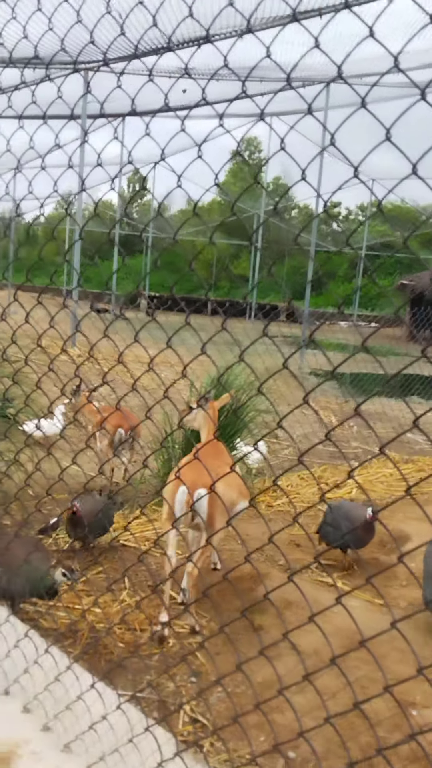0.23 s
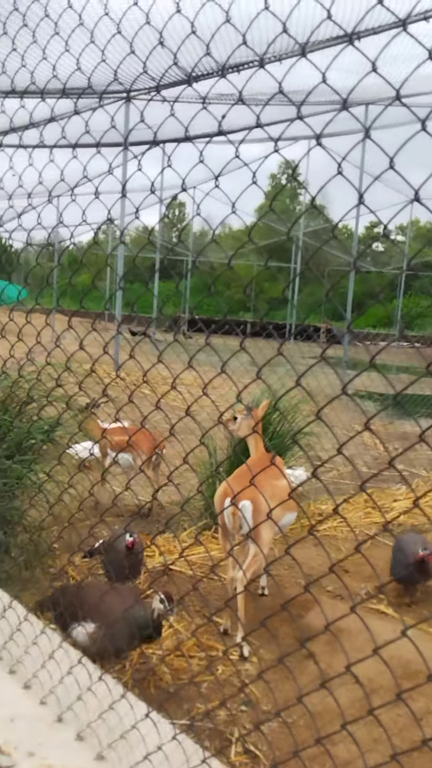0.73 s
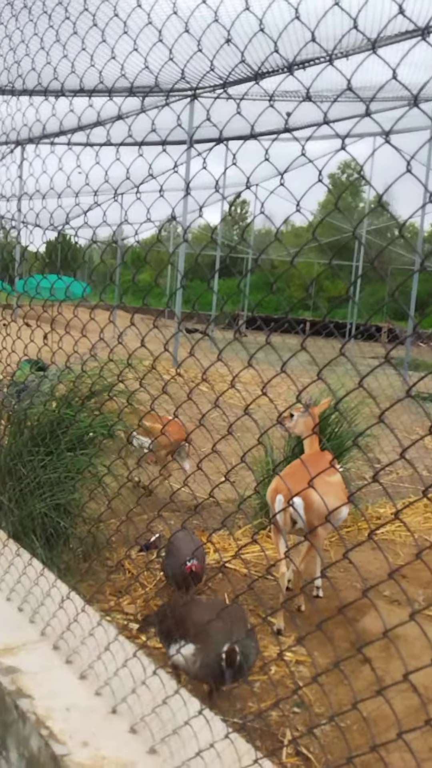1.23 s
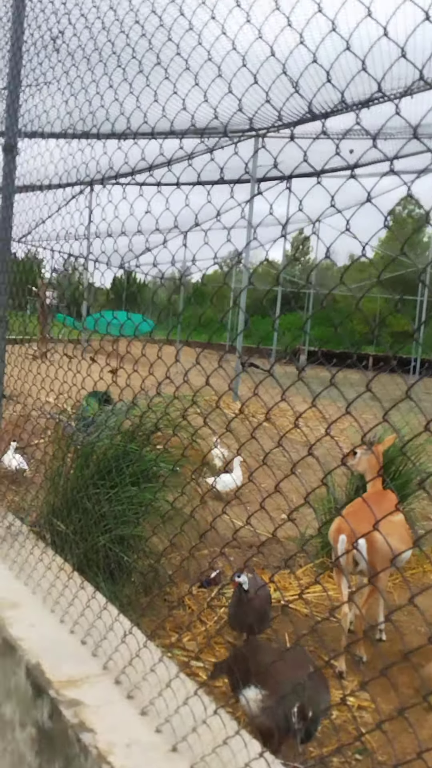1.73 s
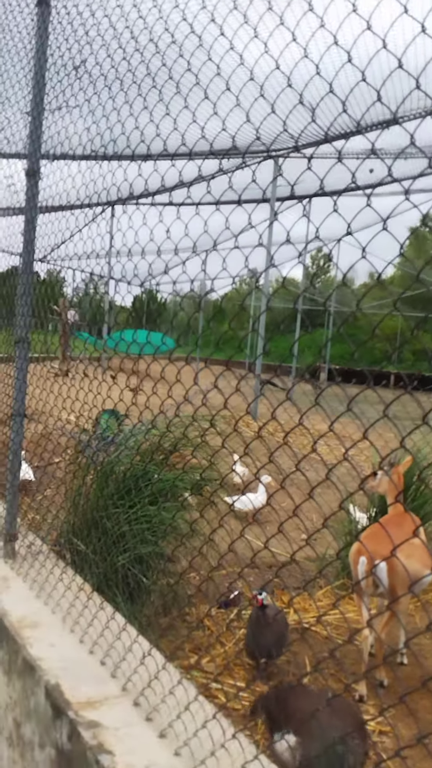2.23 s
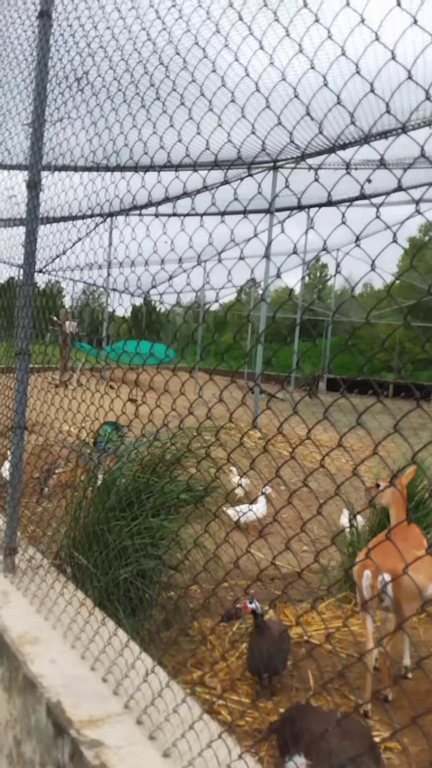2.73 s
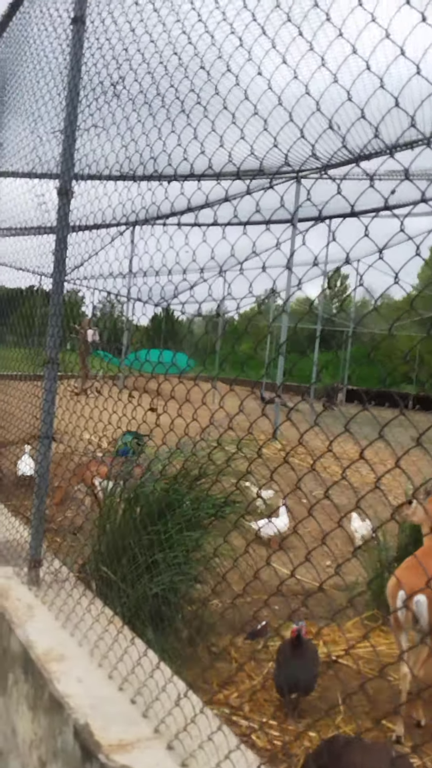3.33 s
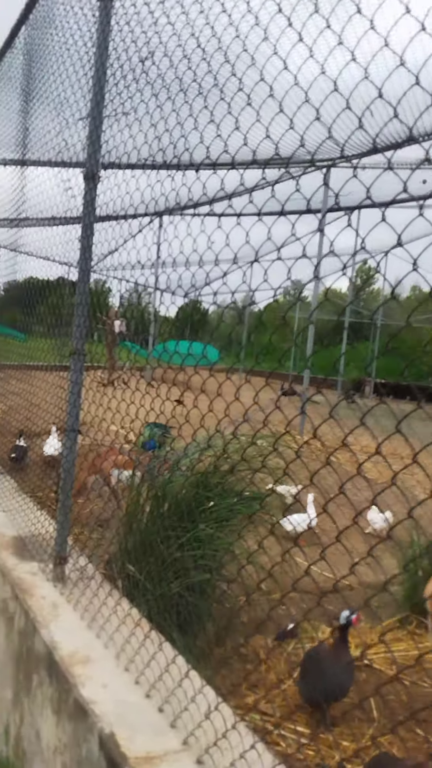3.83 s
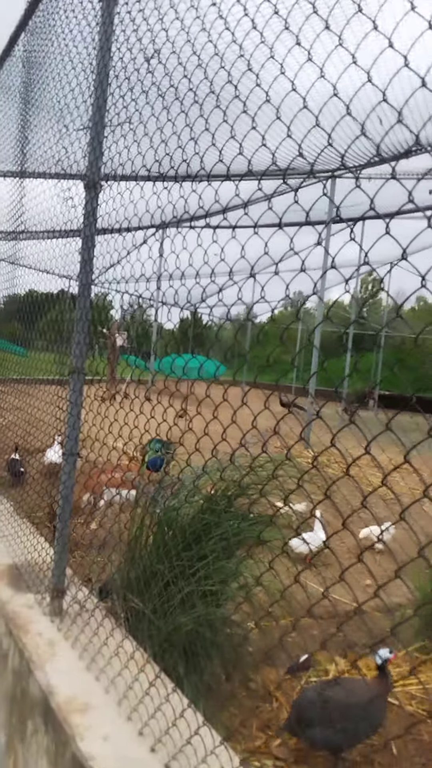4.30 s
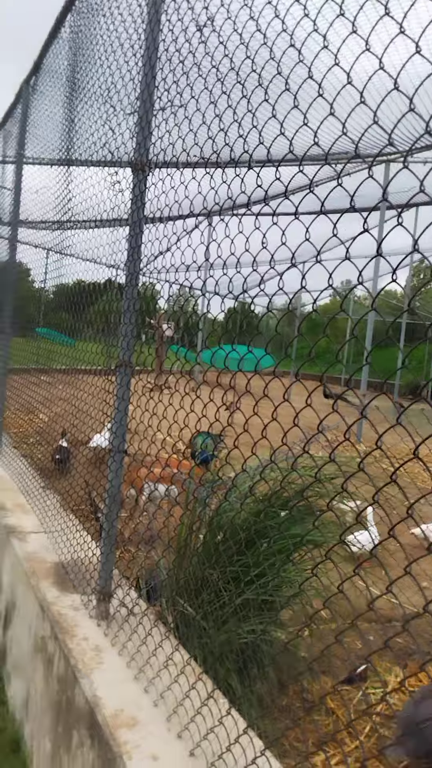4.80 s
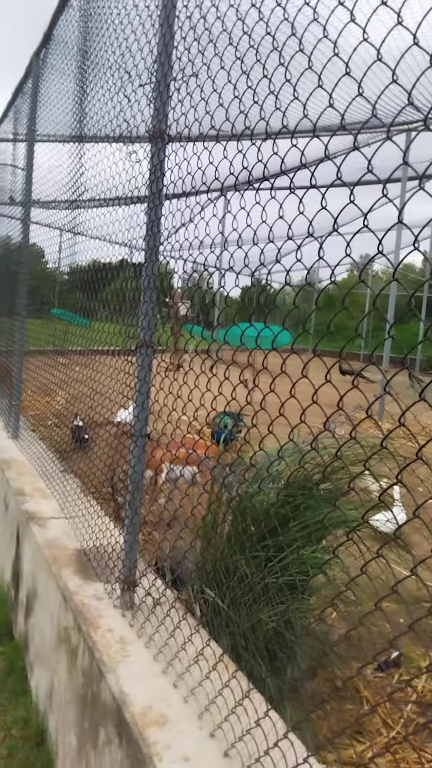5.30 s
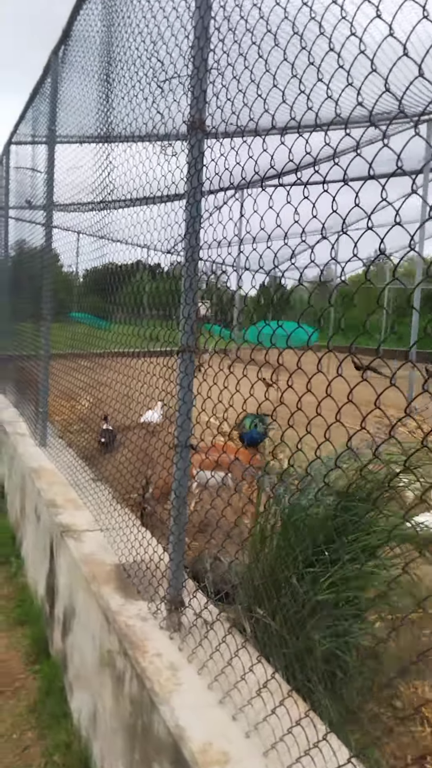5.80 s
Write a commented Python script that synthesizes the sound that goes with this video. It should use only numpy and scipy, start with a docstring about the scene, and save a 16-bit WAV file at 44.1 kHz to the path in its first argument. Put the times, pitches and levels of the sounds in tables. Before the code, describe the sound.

Guineafowl give sharp, squeaky chirps in a gusty outdoor pen, then break into a fast, harsh rattling run while wind buffets the microphone.

```python
"""Guineafowl in a gusty open enclosure

Close guineafowl chirp, then break into a harsh rattling run: falling harmonic tones, roughened by a second
membrane, are filtered by a throat and reflected by the yard. Gusts buffet two microphone ports in turn with
shaped noise and sharp pressure dips. After a faint rasp, a far crow caws and another bird honks, as pulse trains
through a resonance; a small bird twitters in gliding sines. Straw rustles and open air hisses, as coloured noise."""
import sys
import numpy as np
from scipy import signal
from scipy.fft import rfft, irfft, next_fast_len
from scipy.io import wavfile
from scipy.ndimage import uniform_filter1d

SR = 44100
rng = np.random.default_rng(int(sys.argv[2]) if len(sys.argv) > 2 else 0)


def master_out(mix):
    """Clip the mix to full scale and print it as 16-bit PCM to the path in sys.argv[1]."""
    frames = np.transpose(np.atleast_2d(mix))
    ceiling = np.clip(frames, -1, 1)
    pcm = np.round(ceiling * 32767).astype(np.int16)
    wavfile.write(sys.argv[1], SR, pcm)


N = 266937
TIME = np.arange(N) / SR
# a call swells by twice SWELL_DB while its pitch falls by the share FALL; a squeak leads into it
SWELL_DB, FALL, SQUEAK_DB = 3.0, 0.115, -11.5
LEAD_S = .022  # the squeak starts this long before the note


def gain_of(db):
    """Logarithmic level: converts decibels to an amplitude ratio."""
    return 10 ** (np.asarray(db) / 20)


def evened(x):
    """Power normalisation: scales a signal to rms 1."""
    return x / np.sqrt(np.mean(x ** 2) + 1e-20)


def read(points, hz):
    """Logarithmic frequency scale: interpolates a spectrum along log frequency."""
    f, value = np.transpose(points)
    return np.interp(np.log(hz + 1), np.log(f), value)


def colour(x, points):
    """Linear filtering: multiplies the transform by a spectrum given in dB."""
    size = next_fast_len(x.shape[-1] + 512)
    gain = gain_of(read(points, np.fft.rfftfreq(size, 1 / SR)))
    return irfft(rfft(x, size) * gain, size)[..., :x.shape[-1]]


def wander(size, hz):
    """Low-passed noise: a smooth random course of rms about 1, with its corner at the given rate."""
    full = next_fast_len(size)
    lowpass = 1 / np.sqrt(1 + (np.fft.rfftfreq(full, 1 / SR) / hz) ** 4)
    return evened(irfft(rfft(rng.standard_normal(full)) * lowpass, full)[:size])


def ports(db):
    """Level difference between channels: left and right gains of mean power 1."""
    return evened(gain_of([[db / 2], [-db / 2]]))


def add(mix, s, sound):
    """Superposition: adds a sound into the mix at a time in seconds."""
    part = mix[:, max(round(s * SR), 0):][:, :sound.shape[-1]]
    part += sound[..., :part.shape[-1]]


def yard(x, db, t60):
    """Diffuse reverberation: ground, wall and fence scatter decaying reflections, different at each port."""
    t = TIME[:int(abs(t60) * SR) + 100]
    taps = rng.standard_normal((2, len(t))) * gain_of(-60 * t / t60)
    taps[:, :10] = 0
    reflections = signal.fftconvolve(x, taps / np.linalg.norm(taps[0]), axes=1)
    return x + gain_of(db) * reflections[:, :x.shape[1]]


def still_air(level_db=-57):
    """Broadband ambient noise: coloured hiss at both ports, swaying slowly in level."""
    # spectrum of the still air: (frequency [Hz], relative density [dB])
    air_colour = [(100, -24), (500, -33), (1000, -2), (2000, 1), (3000, -4), (4500, -2.5), (6500, 0.5),
                  (8000, 3), (10000, 0), (11800, -11.5), (15000, -23)]
    sway_db = .7 * wander(N, 4)
    return gain_of(level_db + sway_db) * evened(colour(rng.standard_normal((2, N)), air_colour))


def wind_force():
    """Unsteady flow: amplitudes at each port of the steady flow and of puffs that rise, hold and fall."""
    # force of the steady flow on each port: (time [s], force [dB])
    left_curve = [(0.0, -52), (0.36, -53), (0.5, -81), (0.93, -66), (1.02, -51), (1.19, -40), (1.31, -24.5),
                  (1.49, -57.5), (3.07, -55.5), (3.2, -38), (3.38, -52), (3.64, -55.5), (3.74, -29),
                  (4.0, -16.5), (4.36, -20), (4.47, -45), (4.85, -41.5), (4.98, -63.5), (6.05, -69.5)]
    right_curve = [(0.0, -56), (0.45, -53), (0.75, -65), (1.0, -42), (1.22, -67), (1.43, -31), (1.7, -20),
                   (1.85, -25), (2.48, -23), (2.8, -34.5), (3.12, -21), (3.45, -33.5), (3.8, -30),
                   (4.08, -50), (4.85, -50), (4.96, -72), (5.32, -48.5), (5.93, -54.5), (6.05, -70)]
    # puffs striking mainly one port: (start [s], hold length [s], force [dB], left-right difference [dB])
    puff_table = [(0.0, 0.13, -46.5, 23), (0.18, 0.086, -50, -17), (0.27, 0.069, -47, 19),
                  (0.555, 0.089, -35, -49), (0.678, 0.11, -49.5, 16), (0.837, 0.097, -39, -27),
                  (1.005, 0.065, -40.5, 28), (1.254, 0.16, -35, 28), (1.42, 0.087, -31.5, -27),
                  (1.563, 0.058, -43, 15), (2.128, 0.12, -53.5, 18), (2.688, 0.075, -48.5, 15),
                  (2.983, 0.077, -28, -41), (4.431, 0.095, -35.5, -28), (4.721, 0.051, -38, -33),
                  (5.074, 0.096, -48.5, -0.5), (5.295, 0.032, -56, 14), (5.542, 0.097, -47.5, -26),
                  (5.748, 0.044, -46.5, 40), (5.896, 0.033, -55, -16)]
    attack_s, release_s = 0.022, 0.032
    flow = gain_of([np.interp(TIME, *np.transpose(curve)) for curve in (left_curve, right_curve)])
    puffs = np.zeros((2, N))
    for s, length, db, side_db in puff_table:
        before = np.maximum(s - TIME, 0) / attack_s
        after = np.maximum(TIME - s - length, 0) / release_s
        envelope = np.exp(-np.minimum(before + after, 10) ** 2)
        puffs += gain_of(db) * ports(side_db) * envelope
    return flow, puffs


def wind(force, puffs, rumble_db=-19.0, rumble_growth=0.11, buffet_db=1.5, lump_db=4.0, burst_db=6.5,
         burst_hz=55):
    """Turbulent pressure noise: each port's own eddies give a lumpy rumble and a sputtering buffet."""
    # spectra of the rumble and the buffet: (frequency [Hz], relative density [dB])
    rumble_colour = [(15, -21), (35, -19), (60, -6), (100, 1.5), (170, -4.5), (260, -11), (400, -24),
                     (700, -56.5), (1500, -115)]
    buffet_colour = [(80, -44), (200, 1), (320, 0.5), (500, -5), (800, -17), (1200, -30), (2000, -37.5),
                     (4000, -51), (12000, -77)]
    knee_db = -42.5  # above this force the rumble hardly grows, while the buffet grows on
    puff_rumble_db = 2.5  # a puff is a large slow eddy: it rumbles more than the steady flow does
    out = np.zeros((2, N))
    for side in range(2):
        over = force[side] / gain_of(knee_db)
        slow = over / np.sqrt(1 + over ** 2) ** (1 - rumble_growth)
        slow *= gain_of(puff_rumble_db * puffs[side] / force[side])
        eddies = wander(N, burst_hz)
        lumps = gain_of(lump_db * eddies)
        bursts = gain_of(burst_db * eddies + 2 * wander(N, 400))
        rumble = colour(rng.standard_normal(N) * lumps, rumble_colour)
        buffet = colour(rng.standard_normal(N) * bursts, buffet_colour)
        for layer, gain in ((rumble, slow * gain_of(rumble_db)), (buffet, force[side] * gain_of(buffet_db))):
            # levelled over 4000 samples, so that the force sets the slow course
            out[side] += gain * layer / np.sqrt(uniform_filter1d(layer ** 2, size=4000) + 1e-12)
    return out


def slaps(force, level_db=0.0, width=.0005):
    """Vortex pressure: a small vortex crossing a port gives one sharp dip of pressure."""
    # the hardest slaps, shared between the ports by force: (time [s], relative peak [dB])
    hard_slaps = [(1.074, -20), (1.298, -12), (1.588, -15), (1.667, -6), (1.72, -4.5), (1.893, -1.5),
                  (2.015, -11), (2.097, -5.5), (2.199, -11), (2.271, -9.5), (2.288, -7), (2.453, -9),
                  (3.167, -9), (3.876, -7), (3.919, -2), (4.116, -9), (4.267, -2.5)]
    # lesser slaps come by chance at each port, sized by the force of the wind
    per_s, over_force_db, spread_db = 16, 8, 8.5
    u = (np.arange(801) - 400) / SR / width
    dip = -(1 - .4 * u ** 2) / (1 + .5 * u ** 2) ** 3 * np.exp(-(u / 5) ** 2)
    sizes = force * gain_of(over_force_db + spread_db * rng.uniform(-1.5, 1, (2, N)))
    hits = sizes * (rng.random((2, N)) < per_s / SR)
    for s, db in hard_slaps:
        add(hits, s, gain_of(db + level_db) * evened(force[:, [round(s * SR)]]))
    return signal.oaconvolve(hits, dip[None], "same")


def note(length, db, swell_db, start_hz, end_hz, rough, bright_db, lead_db, size=5120, second_hz=850, flutter=0.11,
         rasp=0.43, second_harmonic_db=6.5, release_db=-27):
    """Source-filter voice: a rising squeak leads into a loud note; a second membrane makes it a screech."""
    # response of the bird's throat and beak: (frequency [Hz], gain [dB])
    throat = [(500, -111), (1000, -9), (1250, -8), (1700, -7), (2150, -0.5), (2750, 0), (3500, 2),
              (4600, -3), (6000, -10), (8200, -12.5), (10200, -9.5), (12000, -22), (13500, -33),
              (15000, -28.5)]
    t = np.arange(size) / SR - LEAD_S
    corners = [-.022, -.011, -.003, .001, .17 * length, .55 * length, .85 * length, length + .002, length + .02]
    corner_db = [lead_db - 26, lead_db - 8, lead_db, -6.5, 0, 1, -2, -10, release_db - 14 * (1 - rough)]
    level_db = np.interp(t, corners, corner_db)
    level_db += 2 * swell_db * (np.clip(t / length, 0, 1) - .5)
    shape = gain_of(level_db) * np.clip((length + .03 - t) / .01, 0, 1)
    # degree to which the tone breaks up over the note
    force = rough * np.interp(t, [0, .006, .6 * length], [.7, .45, 1])
    glide = [.7 * start_hz, 1.06 * start_hz, start_hz, .55 * start_hz + .45 * end_hz, .97 * end_hz]
    hz = np.interp(t, [-.022, -.007, .002, .5 * length, length + .006], glide)
    turns = np.cumsum(hz * (1 + .1 * (force + .17) * wander(size, 1000))) / SR
    # the second membrane modulates phase, level and breath noise
    second = np.sin(2 * np.pi * np.cumsum(second_hz * (1 + .06 * wander(size, 400))) / SR)
    turns = turns + flutter * force * second
    # the squeak is mostly the second harmonic; the others join at full pressure
    joined = np.interp(t, [-.008, .004], [.2, 1])
    others = sum(np.cos(2 * np.pi * (k * turns + rng.random())) for k in range(3, 11))
    others += (0.78 + 0.16 * rough) * np.cos(2 * np.pi * turns)  # the fundamental grows with effort
    second_harmonic = gain_of(second_harmonic_db * (0.5 - 0.51 * force)) * np.cos(4 * np.pi * turns)
    voice = second_harmonic + joined * others
    breath = rng.standard_normal(size) * (1 + 2.56 * second) * joined
    drive = evened(voice) * (1 + 1.3 * force * second) + rasp * (force + .12) * breath
    # roughness is offset in level, apart from small uneven bursts
    drive *= np.exp(.25 * force * wander(size, 160)) / np.sqrt(1 + force ** 2)
    sound = colour(colour(drive * shape, throat), [(3500, 0.0051), (8000, bright_db)])
    return gain_of(db) * sound / np.sqrt(np.sum(sound ** 2) / (length * SR))


def chirp_notes():
    """Frequency glide: single calls swell and fall in pitch after their squeak."""
    # guineafowl calls: (start [s], nominal length [s], relative level [dB], nominal starting pitch [Hz],
    # roughness [about 0-1], brightness at 8 kHz [dB])
    chirps = [(0.221, 0.011, -47.5, 1464, 0, -22), (0.942, 0.027, -14.5, 1663, 0.25, 0.5),
              (1.16, 0.012, -19.5, 1585, 0.13, -5), (1.912, 0.018, -29.5, 1515, 0.27, 1.5),
              (2.204, 0.042, -45.5, 1610, 0.56, 2), (2.382, 0.019, -22.5, 1770, 0.21, 7),
              (2.717, 0.0058, -19, 1600, 0, 7.5), (2.892, 0.033, -31.5, 1592, 0.32, 1),
              (3.053, 0.036, -15, 1670, 0.69, 3), (3.176, 0.031, -22.5, 1590, 0.5, 0.5),
              (3.283, 0.03, -18, 1700, 0.83, -1.5), (3.307, 0.027, -13.5, 1575, 0.26, 0),
              (3.421, 0.027, -15.5, 1660, 0.87, -1.5), (3.477, 0.032, -14.5, 1654, 0.28, 0.5),
              (3.595, 0.026, -15, 1715, 1.03, -4), (3.642, 0.018, -29.5, 1570, 0.28, -5),
              (3.763, 0.034, -15.5, 1657, 0.85, -4), (4.014, 0.028, -24.5, 1650, 0.87, -1.5),
              (4.043, 0.021, -13.5, 1528, 0.08, -4), (4.198, 0.014, -32.5, 1448, 0.63, -11),
              (4.559, 0.018, -27.5, 1500, 0.5, -6), (4.592, 0.017, -18.5, 1535, 0.56, -4),
              (5.087, 0.018, -20, 1564, 0.54, -10), (5.799, 0.0075, -28, 1560, 0.37, -2),
              (5.895, 0.031, -12, 1651, 0.52, -3)]
    return [(s, note(length, db, SWELL_DB, hz, hz * (1 - FALL), rough, bright_db, SQUEAK_DB))
            for s, length, db, hz, rough, bright_db in chirps]


def rattle_notes():
    """Forced phonation: the run starts with falling calls and settles into level, abrupt screeches."""
    # notes of the harsh run: (start [s], nominal length [s], relative level [dB])
    run = [(4.37, 0.036, -13.5), (4.508, 0.033, -14), (4.622, 0.033, -14.5), (4.727, 0.037, -15.5),
           (4.824, 0.037, -13.5), (4.918, 0.034, -16.5), (5.011, 0.033, -13), (5.106, 0.032, -15.5),
           (5.191, 0.029, -13), (5.285, 0.029, -13.5), (5.374, 0.032, -16), (5.476, 0.035, -15.5),
           (5.577, 0.038, -17.5), (5.677, 0.034, -21)]
    # central roughness and brightness, each varied at random from note to note
    mid_rough, rough_scatter, mid_bright_db, bright_scatter_db = 0.91, 0.11, 1.8, 2.5
    # through the run the pitch sags and each note's weight moves to its front
    first_hz, sag_hz_per_s, swell_loss_db_per_s = 1800, 82, 5.5
    # the fall dies out and the squeak weakens over this time
    settle_s, squeak_loss_db = 0.55, 14
    notes = []
    for (s, length, db), (press, gape) in zip(run, rng.uniform(-0.83, 1, (len(run), 2))):
        elapsed = s - run[0][0]
        settled = 1 - np.exp(-(elapsed / settle_s) ** 4)
        hz = first_hz - sag_hz_per_s * elapsed
        swell_db = SWELL_DB - swell_loss_db_per_s * elapsed
        end_hz = hz * (1 - FALL * (1 - settled))
        lead_db = SQUEAK_DB - squeak_loss_db * settled
        rough = mid_rough + rough_scatter * press
        bright_db = mid_bright_db + bright_scatter_db * gape
        notes.append((s, note(length, db, swell_db, hz, end_hz, rough, bright_db, lead_db)))
    return notes


def guineafowl(level_db=-3.0):
    """Early reflections: the birds move, so each note of the flock meets its own ground reflections."""
    # where the flock stands as the microphone turns: (time [s], left-right difference [dB])
    bearing = [(1.2, -3), (1.9, 6), (4.0, 0), (6.0, 3.3)]
    out = np.zeros((2, N))
    for s, voice in chirp_notes() + rattle_notes():
        side_db = np.interp(s, *np.transpose(bearing))
        add(out, s - LEAD_S, yard(ports(side_db) * voice, -2.0, .016))
    return gain_of(level_db) * out


def spread(x):
    """Phase difference and comb filtering: ports hear a near source out of phase, each with its own comb ripple."""
    hz = np.fft.rfftfreq(N, 1 / SR)
    comb = .33 * np.exp(-2j * np.pi * hz * .00115) / (1 + (hz / 6000) ** 2)  # 1.15 ms late
    lag = np.exp(-1.7j * np.clip(hz / 1000, 0, 1))
    pair = np.array([1 + comb, (1 + .6j * comb) * lag])
    return irfft(rfft(x) * pair, N)


def wash(x, db=-20.5, t60=0.82):
    """Exponential energy decay: a diffuse hiss swells with each note and dies away slowly."""
    # spectrum of the lingering hiss: (frequency [Hz], relative density [dB])
    hiss_colour = [(400, -15), (1200, 1.5), (2500, 3), (4300, 2.5), (7000, -1.5), (9800, 0), (12000, -15.5),
                   (15000, -21)]
    r = gain_of(-120 / (t60 * SR))  # decay of power per sample
    power = signal.lfilter([1 - r], [1, -r], (x ** 2).mean(0))
    return gain_of(db) * np.sqrt(power) * evened(colour(rng.standard_normal((2, N)), hiss_colour))


def far_call(length, db, hz, rasp, throat_hz, width_hz, size=32768):
    """Subharmonic pulse train: alternately strong and weak pulses on an arching pitch excite one resonance."""
    arch = abs(np.sin(np.pi * np.clip(np.arange(size) / SR / length, 0, 1)))
    turns = np.cumsum(hz * (.91 + .09 * arch) * (1 + .03 * rasp * wander(size, 150))) / SR
    pulses = sum(np.cos(2 * np.pi * k * turns) for k in range(1, 20))
    pulses = pulses * (1 + rasp * np.cos(np.pi * turns))
    resonance = 1 / (1 + abs((np.fft.rfftfreq(size, 1 / SR) - throat_hz) / width_hz) ** 3)
    sound = irfft(rfft(evened(pulses) + .5 * rasp * rng.standard_normal(size)) * resonance)
    return gain_of(db) * evened(sound) * arch ** .8


def far_birds(chirp_db=-57):
    """Distant sources: reverberant rasp, caws and honks, and a small bird see-sawing between falling chirps."""
    # a faint rasp at .62 s, then calls of the crow, then of the honking bird: (start [s], length [s],
    # relative level [dB], pitch at the top of the arch [Hz], rasp [0-1], resonance centre [Hz])
    rasp_and_caws = [(.62, .15, -66, 150, .8, 2450), (1.52, .38, -52, 145, .55, 1760),
                     (2.15, .47, -52, 150, .55, 1780)]
    honks = [(3.1, .25, -40, 221, .04, 860), (3.72, .32, -54, 238, .25, 1400)]
    out = np.zeros((2, N))
    for s, *call in rasp_and_caws:
        add(out, s, far_call(*call, width_hz=450))
    for s, *call in honks:
        add(out, s, far_call(*call, width_hz=.27 * call[-1]))
    out = yard(out, 3, .16)
    t = np.arange(1700) / SR
    for k in range(17):  # pairs, each a little softer
        for s, hz, db in [(.07, 6400, chirp_db), (.162, 6150, chirp_db - 2)]:
            chirp = np.sin(2 * np.pi * np.cumsum(hz * (1 - 3.2 * t)) / SR) * np.hanning(len(t))
            add(out, s + k * .1745, gain_of(db - .4 * k) * chirp)
    return out


def rustle(s=.62, length=0.27, db=-50):
    """Friction noise: something brushes through dry straw, fine crackles under a soft swell."""
    size = 13000
    swell = np.sin(np.pi * np.clip(np.arange(size) / SR / length, 0, 1)) ** 2
    crackles = rng.standard_normal((2, size)) * gain_of(3 * wander(size, 200))
    straw = colour(crackles, [(700, -14), (1600, 5.5), (4500, -3), (9000, 4.5), (11500, -10)])
    out = np.zeros((2, N))
    add(out, s, gain_of(db) * swell * evened(straw))
    return out


def scene():
    """Superposition of near and far birds, wind, straw and the hiss of the open air."""
    near = spread(guineafowl())
    flow, puffs = wind_force()
    force = np.hypot(flow, puffs)
    gusts = wind(force, puffs) + slaps(force)
    return still_air() + gusts + near + wash(near) + far_birds() + rustle()


def record(dry):
    """Saturation and band limiting: the loudest peaks are rounded off, then the top band is cut."""
    edge_hz = 15900
    rounded = dry / (1 + (dry / .93) ** 8) ** (1 / 8)
    lowpass = signal.firwin(301, edge_hz, window=("kaiser", 8), fs=SR)
    return signal.oaconvolve(rounded, lowpass[None], "same")


dry = scene()
out = record(dry)
master_out(out)
```